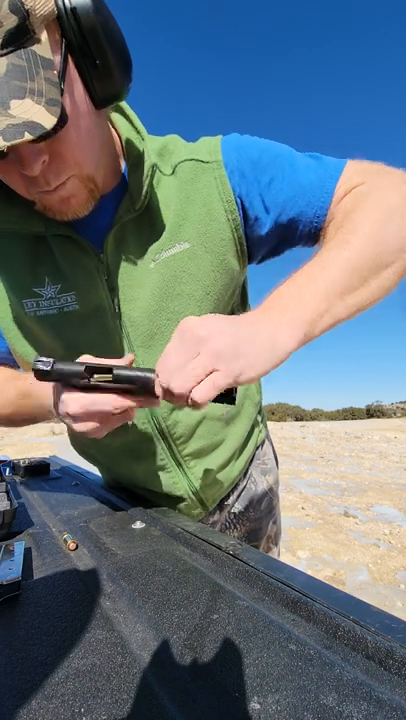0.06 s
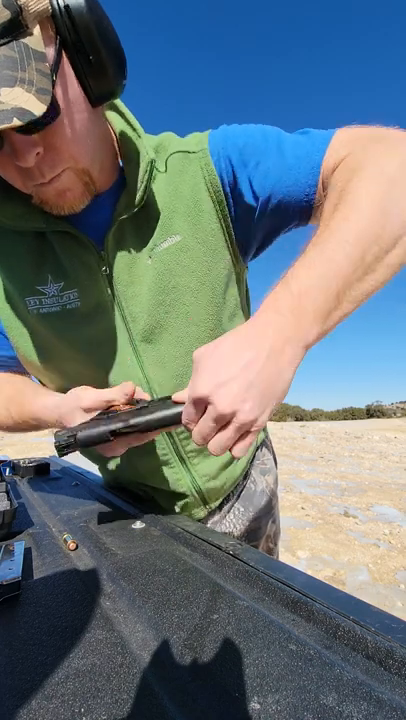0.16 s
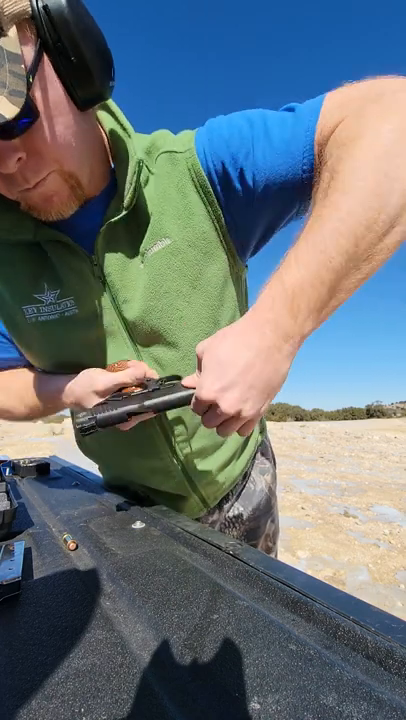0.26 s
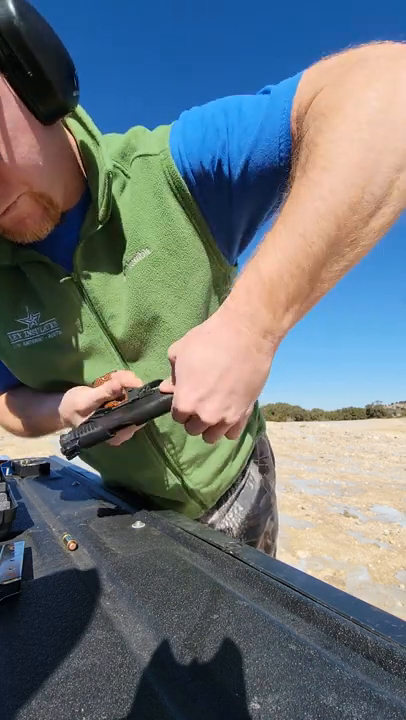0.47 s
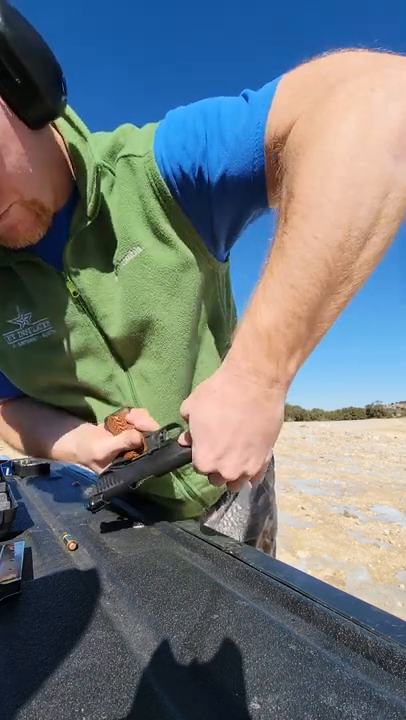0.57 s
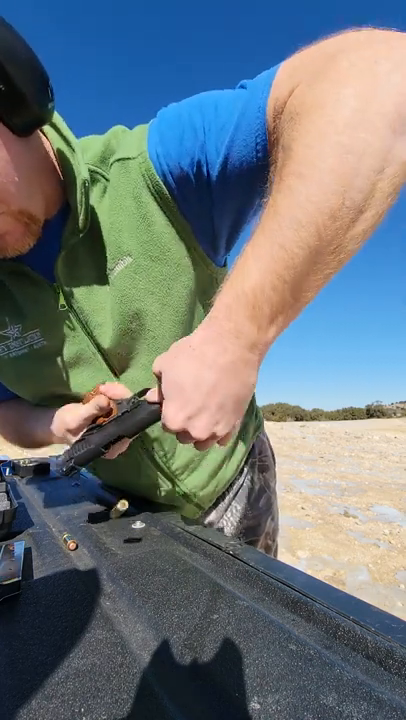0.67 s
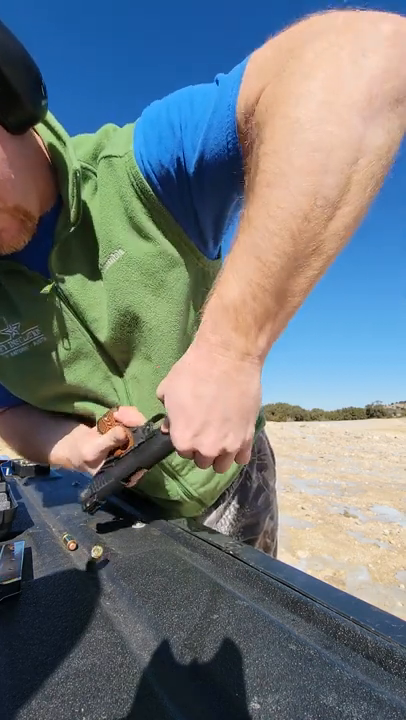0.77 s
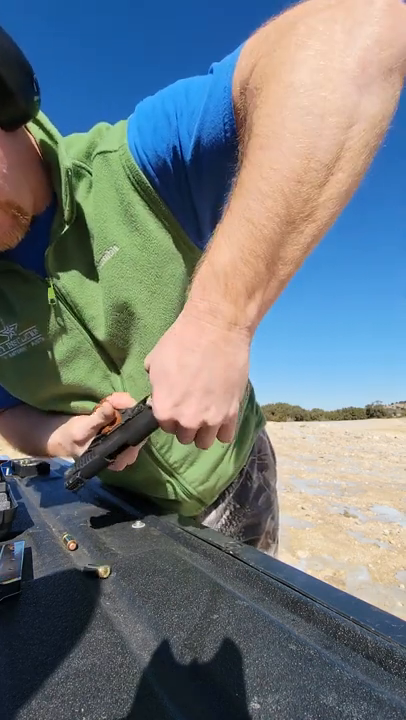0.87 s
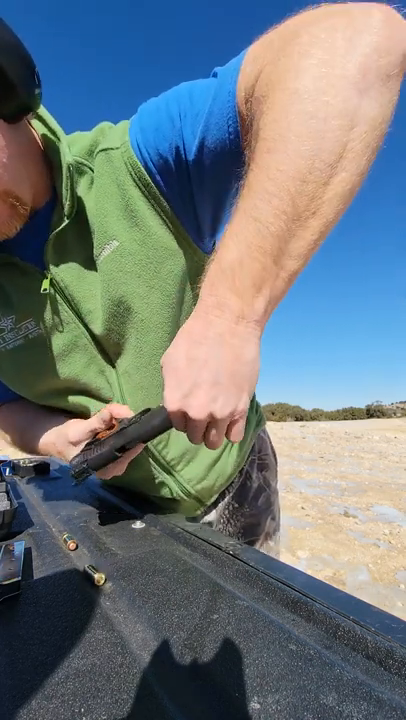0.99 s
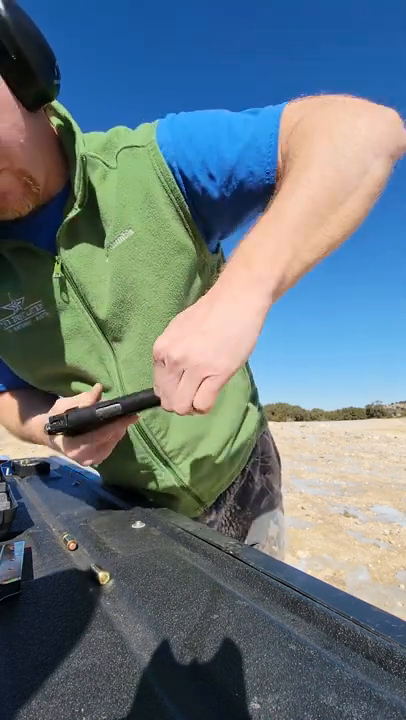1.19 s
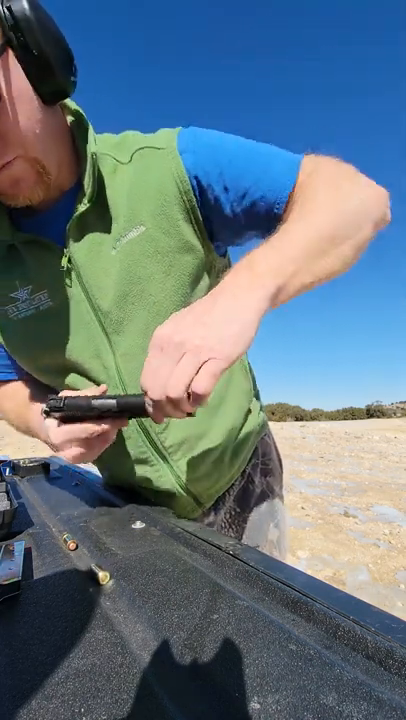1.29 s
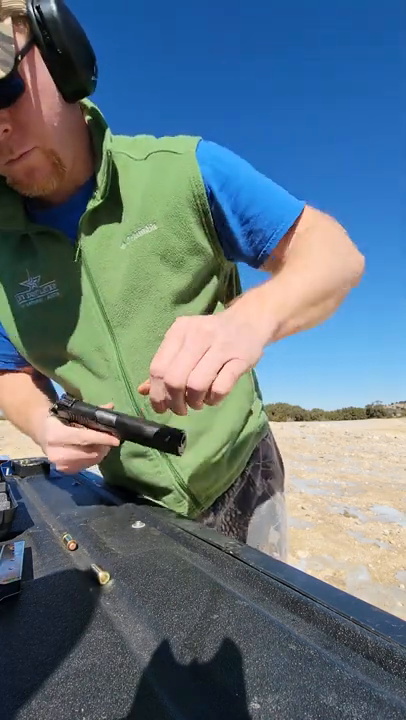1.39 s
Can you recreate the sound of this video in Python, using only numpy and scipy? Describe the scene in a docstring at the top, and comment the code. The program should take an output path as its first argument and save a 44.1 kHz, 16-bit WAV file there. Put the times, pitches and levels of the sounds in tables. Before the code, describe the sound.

Close by and outdoors, a pistol's steel slide clicks and scrapes open. The ejected cartridge knocks and bounces on a pickup bed cover before the slide closes with a double clack, over light wind rumble on the microphone.

```python
"""A pistol's steel slide, worked by hand, squeaks, scrapes and clicks back, ringing the frame.
The ejected cartridge drops on the cover of a pickup bed, which booms, and bounces to rest.
Then the slide runs home with a double clack.
Underneath is an outdoor bed of light wind rumble and faint hiss."""
import sys
import numpy as np
from scipy import signal
from scipy.io import wavfile
from scipy.ndimage import uniform_filter1d

SR = 44100
rng = np.random.default_rng(int(sys.argv[2]) if len(sys.argv) > 2 else 0)


def bounce(signal):
    """Save signal as a 16-bit WAV file at the path given by the first command-line argument."""
    frames = np.transpose(np.atleast_2d(signal))
    limited = np.clip(frames, -1, 1)
    pcm = np.round(limited * 32767).astype(np.int16)
    wavfile.write(sys.argv[1], SR, pcm)


N = 63945
T = np.arange(N) / SR

# Levels are relative within a layer; pan is left over right; likeness is left-right correlation.
# steel-on-steel clicks: t/s, level/dB, decay/s, knock/dB, body/dB, edge/dB, ring f/Hz
SLIDE_CLICKS = [(0.208, -32.5, .003, 14, 13, -2, 2390), (.2230, -27, .0015, -14, 12.5, -6, 4180),
                (0.2255, -23.5, 0.0016, 6.5, -28, -20, 4800), (0.2448, -12, 0.00031, -15, -1, -2.5, 5000),
                (0.2659, -17.5, .0008, -10, -7.5, -5, 5820), (0.2739, -21, 0.0022, -20, -3, -7, 6380),
                (0.2778, -32.5, .003, -4, -5.5, -3, 6030), (0.398, -40.5, .002, 2, -28, 8.5, 5860),
                (0.414, -38.5, .002, 17.5, 13, -15, 936), (0.4535, -25.5, 0.00085, 1, 4.5, 3, 4090),
                (0.487, -10, 0.0019, -1, -2.5, -13, 4490), (0.4977, -22.5, 0.00076, -16, 3, -1, 4900),
                (0.5102, -27.5, 0.00099, 2, 10.5, 13.5, 6370), (0.5128, -29, 0.0054, -18, 4, 7, 5940),
                (0.5355, -9.5, 0.0016, -8, -1, 6, 3490), (0.5422, -33, .002, 12, 5, -14.5, 4550),
                (0.6079, -35.5, 0.0013, 7, 6.5, -8.5, 2600), (0.6272, -16, 0.0005, -17, -7.5, -16, 5700),
                (0.6301, -12, 0.00042, -15, -1, -8.5, 5010), (0.6392, -37.5, 0.0012, 4.5, 17, 14, 2597),
                (0.6527, -29.5, 0.00051, -11, 1.5, 11, 6090), (0.6602, -20.5, 0.0018, -5, -2.5, 2, 4500),
                (0.679, -22.5, 0.0018, 6, 6, -1.5, 4880), (0.7042, -16.5, .001, -10.5, -5, -11.5, 5670),
                (0.7082, -18, 0.00033, -25, 2.5, 6, 4800), (0.7149, -22, 0.0018, -5.5, 3.5, 2, 4930),
                (0.744, -31, 0.00083, 1.5, 2.5, 4.5, 5200), (0.774, -56.5, 0.0012, 22.5, -4, 5.5, 840),
                (0.801, -31.5, 0.0023, 8, 8, -6.5, 2670), (1.0578, -31.5, .003, 0, 2.5, 3, 5530),
                (1.078, -33, .002, 20, -3, 4, 5590), (1.0972, -29, .0015, 1.5, 3, 8, 4390),
                (1.1686, -14.5, 0.0031, -8.5, 1.5, 0, 5325), (1.1781, -8.5, 0.0012, -4, 0, 7.5, 2784),
                (1.1917, -16, 0.0017, 6.5, 4.5, 17.5, 6500), (1.3494, -56, 0.0018, 0, -1, 7.5, 5770)]
# the slide rubbing along its rails: start t/s, end t/s, level/dB
SLIDE_SCRAPES = [(0.256, 0.277, -64), (0.352, 0.429, -48.5), (0.441, 0.5, -42.5), (0.483, .53, -29),
                 (0.524, 0.571, -37.5), (0.602, 0.685, -31.5), (0.694, 0.76, -31), (0.763, 0.808, -46.5),
                 (1.147, 1.205, -30.5)]
# resonances of slide and frame: f/Hz, width/Hz, level/dB
STEEL_MODES = [(1060, 450, -9.5), (1967, 210, -10), (2452, 407, -3.5), (3530, 1200, -8), (4240, 220, 0),
               (5040, 387, 0.5), (5366, 356, 1.5), (6095, 490, -3.5), (6620, 370, -1.5), (7014, 603, -6.5),
               (10270, 400, -20.5), (12140, 130, -16), (12320, 400, -24.5), (14030, 1600, -19)]
# the pistol's place in the stereo field: t/s, pan/dB
PISTOL_PAN_CURVE = [(.22, -5), (.45, -5), (.75, -4.5), (1.19, -2.5)]
# the cartridge landing on the cover: t/s, level/dB, boom/dB, brightness/(dB per octave), pan/dB
LANDINGS = [(.8585, -18.5, 8, 0.5, -5), (0.925, -32.5, -1.5, -8, -3.5), (1.0008, -19.5, -21, -3.5, -9.5),
            (1.0355, -47, 0, 5, -5), (1.0810, -63, 27, 11.5, -4)]
# the cover's wash of dense modes: f/Hz, spectral level/dB, t60/s, build-up/s
COVER_WASH = [(59.7, -11, .7, .012), (130.6, -6.5, 0.79, 0.017), (220, 0, 0.43, 0.0055),
              (520, 0, 0.51, 0.004), (930, 5.5, 0.33, 0.018), (1447, 8.5, 0.2, 0.012),
              (1900, 4.5, .22, .001), (3260, -4, 0.15, 0.00013), (6890, -19, 0.22, 0.00048),
              (9500, -41.5, .2, 0.00045), (15050, -29.5, 0.26, .0004)]
# the cover's strongest modes: f/Hz, level/dB, t60/s
COVER_TONES = [(68.6, -16.5, 0.78), (187, -13.5, 0.69), (218.6, -13.5, 0.7), (266.2, -14, 0.4),
               (382, -28, 0.26), (535.7, -7, 0.37), (813, -7, 0.38), (1483, -19, 0.37), (2077, -8, 0.26)]
# stereo image of the wash: f/Hz, likeness
WASH_IMAGE = [(60, .3), (190, 0.57), (900, -0.62), (4000, -0.22)]
# rise and fall of the wind: t/s, level/dB
WIND_GUSTS = [(0, -26.5), (.03, -31.5), (.085, -49), (.18, -52), (.23, -45), (.33, -49), (.5, -54.5),
              (.57, -48.5), (.64, -39), (.675, -36), (.73, -60), (.8, -51), (1.15, -46.5), (1.3, -46.5),
              (1.36, -50.5), (1.45, -51)]
# colour of the wind rumble: f/Hz, spectral level/dB
WIND_COLOUR = [(25, -7), (45, 10), (70, 7), (120, -3), (200, -18), (400, -44), (3000, -75)]
# colour of the hiss: f/Hz, spectral level/dB
HISS_COLOUR = [(100, 17), (300, 14.5), (600, 5.5), (1200, -5.5), (3500, -9), (5200, 1.5), (7000, -12),
               (9000, -22.5), (15000, -19.5)]

STEEL_LIKENESS, CUTOFF_HZ = 0.1, 16000


def pistol(trim_db=-1.5):
    """Clicks and scrapes drive the resonances of the hand-damped steel."""
    drive, steel = slide_clicks() + slide_scrapes(), 0
    for k, (hz, width_hz, db) in enumerate(STEEL_MODES):
        radius = np.exp(-np.pi * width_hz / SR)
        feed = np.array([1, 0, -1]) * (1 - radius ** 2) / 2
        feedback = [1, -2 * radius * np.cos(2 * np.pi * hz / SR), radius ** 2]
        steel += (-1) ** k * from_db(db + trim_db) * signal.lfilter(feed, feedback, drive)
    pan_db = np.interp(T, *np.transpose(PISTOL_PAN_CURVE))
    steel *= from_db(pan_db / 2 * [[1], [-1]])
    return steel + steel_tail(steel)


def slide_clicks(ring_share=0.24, rise_share=0.91, grit_db=2.5):
    """Each steel contact is a short crunch of tiny impacts with its own ping and EQ."""
    out, t = np.zeros((2, N)), T[:2048]
    borders_hz = [500, 1678, 3370, 7690, CUTOFF_HZ]  # knock, body, presence, edge
    for s, db, decay, knock_db, body_db, edge_db, hz in SLIDE_CLICKS:
        grit = stereo_noise(STEEL_LIKENESS, len(t)) * from_db(grit_db * rng.standard_normal(len(t)))
        ping = ring_share * np.sqrt(2) * np.sin(2 * np.pi * hz * t)
        envelope = np.exp(-t / decay) * (1 - np.exp(-t / (rise_share * decay))) ** 2
        crunch, click = (rms_one(grit) + ping) * envelope, 0
        for low, high, eq_db in zip(borders_hz, borders_hz[1:], (knock_db, body_db, 0, edge_db)):
            band = np.array([rms_one(side) for side in cut(crunch, [low, high], "band", order=4)])
            click += from_db(eq_db) * np.sqrt((high - low) / SR) * band
        start = int(s * SR)
        out[:, start:start + len(t)] += from_db(db) * click[:, :N - start]
    return out


def slide_scrapes(grains_per_s=6100, spread_db=3, top_hz=7500):
    """Friction on the rails throws off dense grains while the slide moves."""
    level = sum(from_db(db) * ((T > start) & (T < end)) for start, end, db in SLIDE_SCRAPES)
    fires = rng.random(N) < grains_per_s / SR
    strength = from_db(spread_db * np.minimum(rng.exponential(1, N), 4))
    grains = rms_one(fires * strength * stereo_noise(STEEL_LIKENESS))
    return uniform_filter1d(level, size=400) * cut(grains, top_hz, "low")


def steel_tail(steel, ring_db=-10, ring_t60=0.048, scatter_db=-29, scatter_t60=0.2):
    """The steel rings on, and its sound scatters off the truck and the ground."""
    response = sum(from_db(db) * rms_one(stereo_noise() * die_away(T, t60)) / np.sqrt(N)
                   for db, t60 in ((ring_db, ring_t60), (scatter_db, scatter_t60)))
    response = cut(response, 1520, "high", order=1)  # the hand damps the low ring
    return signal.fftconvolve(steel, response, axes=1)[:, :N]


def slide_squeak(start_s=.2098, hz=4705, db=-14, length_s=0.0091, rise_s=.0013):
    """Steel sticks and slips for a moment as the slide starts to move."""
    t = np.maximum(T - start_s, 0)
    envelope = (1 - np.exp(-t / rise_s)) * np.clip(1 - t / length_s, 0, 1)
    return from_db(db) * pan(db=-10) * envelope * np.sqrt(2) * np.sin(2 * np.pi * hz * t)


def cartridge(crack_db=7, crack_decay_s=0.0054, crack_hz=(1250, 4050), wash_db=11):
    """Brass cracks on the cover and sets it booming; the lows bloom later and hang longer."""
    out = np.zeros((2, N))
    wash = [(hz, stereo(*band, at_hz(WASH_IMAGE, hz)[0])) for hz, band in noise_bands(0)]
    for s, db, boom_db, tilt_db, pan_db in LANDINGS:
        t = np.maximum(T - s, 0)

        def eq(hz, boom_hz=900, pivot_hz=1500):
            """This landing's gain: a low shelf for boom, a treble tilt for brightness."""
            return from_db(boom_db / (1 + (hz / boom_hz) ** 2) + tilt_db * np.log2(max(hz / pivot_hz, 1)))

        crack = band_noise(crack_hz, order=4) * np.exp(-t / crack_decay_s) * (t > 0)
        hit = from_db(crack_db) * eq(np.mean(crack_hz)) * crack
        for hz, band in wash:
            level_db, t60, rise = at_hz(COVER_WASH, hz)
            bloom = 1 - np.exp(-t / rise)
            hit += from_db(wash_db + level_db) * eq(hz) * band * bloom * die_away(t, t60)
        for hz, level_db, t60 in COVER_TONES:
            tone = np.sin(2 * np.pi * (hz * t + rng.random((2, 1)) / 2))
            bloom = 1 - np.exp(-t / at_hz(COVER_WASH, hz)[2])
            hit += from_db(level_db) * eq(hz) * tone * bloom * die_away(t, t60)
        out += from_db(db) * pan(pan_db) * hit
    return out


def landing_swell():
    """A brief swish and a low swell rise into the first landing."""
    lead_s = LANDINGS[0][0] - T

    def swell(db, rise_s, hz):
        return from_db(db) * band_noise(hz) * np.exp(-abs(lead_s) / rise_s) * (lead_s > 0)

    return swell(db=-15, rise_s=0.0056, hz=(1123, 4500)) + swell(db=-40, rise_s=0.029, hz=(110, 380))


def wind_bed(hiss_db=-66):
    """Wind rumbles on the microphone over a faint, steady hiss."""
    noise = noise_bands(likeness=0.45)
    rumble, hiss = (rms_one(sum(from_db(at_hz(colour, hz)[0]) * band for hz, band in noise))
                    for colour in (WIND_COLOUR, HISS_COLOUR))
    gusts = from_db(np.interp(T, *np.transpose(WIND_GUSTS)))
    return gusts * rumble + from_db(hiss_db) * hiss


def from_db(db):
    """Decibels to gain."""
    return 10 ** (np.asarray(db) / 20)


def rms_one(x):
    """Scale to unit rms."""
    return x / np.sqrt(np.mean(x ** 2) + 1e-20)


def die_away(t, t60):
    """A fade of 60 dB every t60 seconds."""
    return 1000. ** (-t / t60)


def cut(x, hz, kind, order=3):
    """Butterworth filter."""
    sections = signal.butter(order, np.clip(hz, 10, .45 * SR), kind, fs=SR, output="sos")
    return signal.sosfilt(sections, x + 1e-18)


def pan(db):
    """Constant-power left and right gains."""
    return rms_one(from_db(np.array([[db], [-db]]) / 2))


def at_hz(rows, hz):
    """The columns of a table at one frequency."""
    f, *columns = np.transpose(rows)
    return [np.interp(np.log(hz), np.log(f), column) for column in columns]


def stereo(mid, side, likeness):
    """Left and right from two unrelated noises."""
    return (np.sqrt(1 + likeness) * mid + np.sqrt(1 - likeness) * side * [[1], [-1]]) / np.sqrt(2)


def stereo_noise(likeness=0, size=N):
    """White noise, wide at likeness 0 and mono at 1."""
    return stereo(*rng.standard_normal((2, size)), likeness)


def band_noise(hz, order=3):
    """One band of wide noise at unit rms."""
    return rms_one(cut(stereo_noise(), hz, "band", order))


def noise_bands(likeness):
    """Half-octave bands of stereo noise, as (centre f/Hz, noise)."""
    edges = 22 * 2 ** np.arange(0, 10, .5)
    white = [stereo_noise(likeness), stereo_noise(likeness)]
    return [(np.sqrt(low * high), cut(white[k % 2], [low, high], "band"))
            for k, (low, high) in enumerate(zip(edges, edges[1:]))]


def scene():
    """Pistol up front, then the falling cartridge, over the wind bed."""
    return pistol() + slide_squeak() + landing_swell() + cartridge() + wind_bed()


def record(dry):
    """Peaks clip at full scale and a steep low-pass trims the top."""
    return signal.sosfilt(signal.ellip(10, .2, 80, CUTOFF_HZ, fs=SR, output="sos"), np.clip(dry, -1, 1))


dry = scene()
out = record(dry)
bounce(out)
```